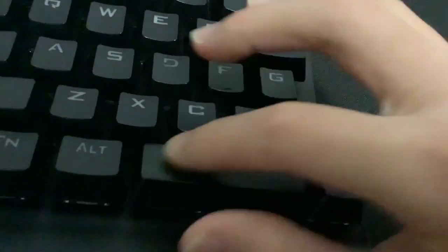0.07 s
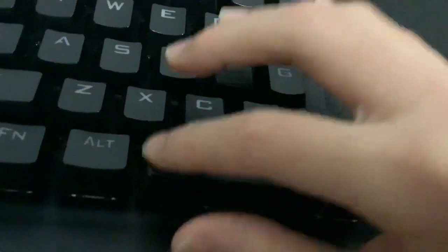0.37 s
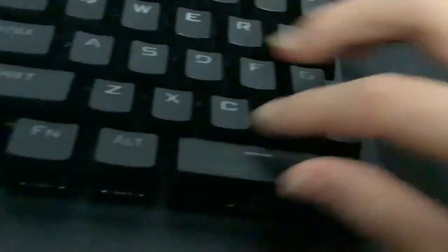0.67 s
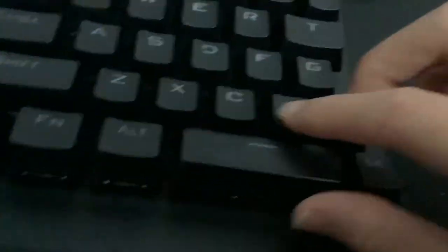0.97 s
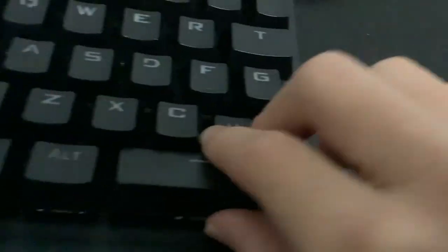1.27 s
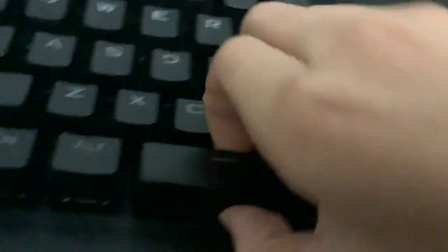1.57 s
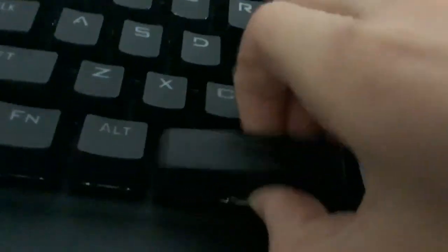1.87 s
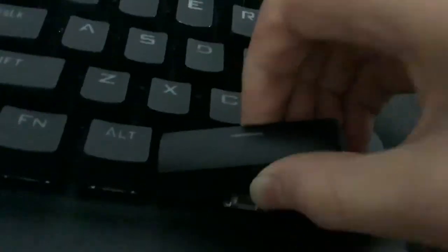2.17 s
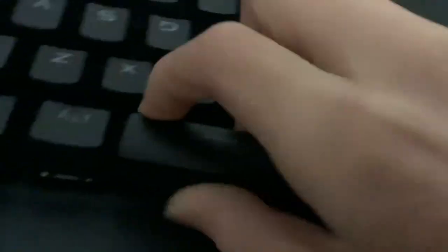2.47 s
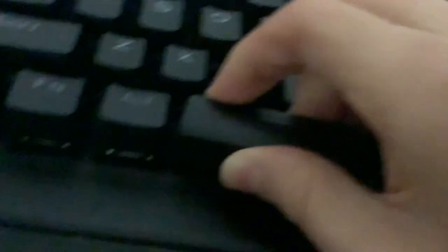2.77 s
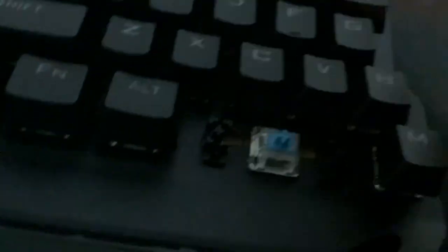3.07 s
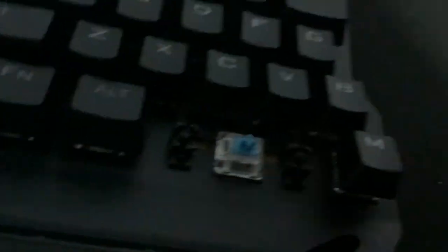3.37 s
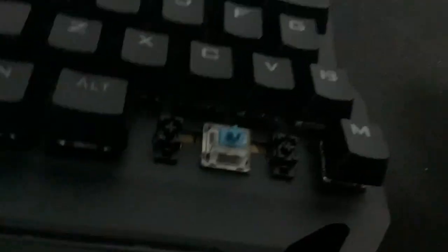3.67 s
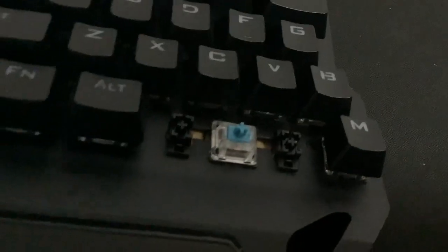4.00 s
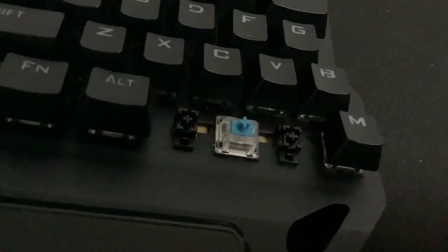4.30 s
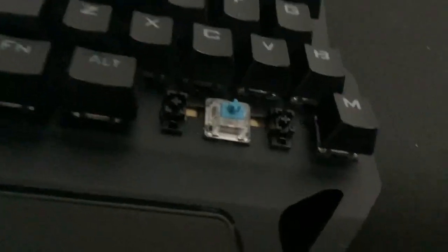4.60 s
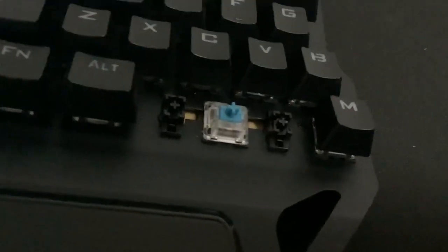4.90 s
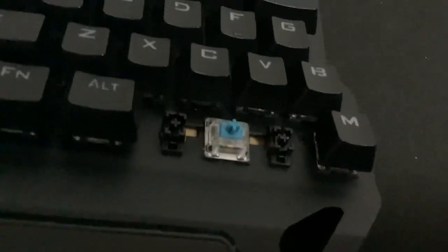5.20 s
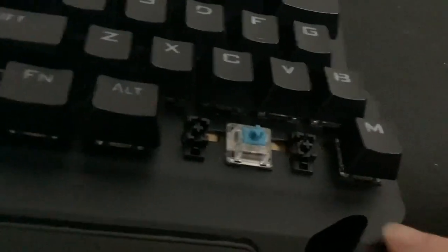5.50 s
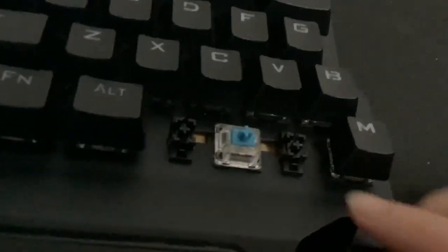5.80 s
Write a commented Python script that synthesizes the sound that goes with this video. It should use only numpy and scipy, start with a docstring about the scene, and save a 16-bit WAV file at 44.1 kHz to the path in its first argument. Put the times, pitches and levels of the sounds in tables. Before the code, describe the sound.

A hand taps three quick, bright keystrokes on a clicky mechanical keyboard. Fingers then rub and rock the space bar, making soft scrapes, small ticks and hollow knocks against the case. The bar comes off with a sharp snap and a thump, slaps the desk and clatters briefly to rest. A fingertip faintly brushes the desk. The microphone is close, in a small quiet room with a low steady rumble.

```python
"""A desk in a small quiet room, microphone close. A hand taps three keystrokes on a clicky mechanical
keyboard, then rubs and rocks the space bar until it snaps off. The long plastic cap slaps the desk
and clatters to rest; a fingertip brushes the desk. Each hit is a brief soft onset of noise, a sharp
contact and chatter ringing a part's resonances; rubbing is a train of tiny slips. Pushes thump the
keyboard case. The room answers each hit, over a low steady rumble."""
import sys
import numpy as np
from scipy import signal
from scipy.fft import rfft, irfft, next_fast_len
from scipy.io import wavfile

SR = 44100
rng = np.random.default_rng(int(sys.argv[2]) if len(sys.argv) > 2 else 0)


def master(y):
    """Save y as 16-bit WAV."""
    cut = np.clip(np.atleast_2d(y).T, -1, 1)
    pcm = np.round(cut * 32767)  # scale
    wavfile.write(sys.argv[1], SR, pcm.astype(np.int16))


N = 257984
HIT_SAMPLES = 4096
HZ = np.fft.rfftfreq(HIT_SAMPLES, 1 / SR)
BOTTOM_LAG_S, TOP_LAG_S = .0078, .012  # from a switch click to the end of key travel, down and up

# Hits: (time [s], level [dB], brightness [dB/octave])
DOWN_CLICKS = [(0.025, -27, -1), (0.1943, -21.5, 2), (0.3787, -21, 2)]
UP_CLICKS = [(0.0998, -24, 0.1), (.2758, -19.5, 1), (0.4523, -20, 2)]
BAR_LANDINGS = [(3.7673, -26.5, -1), (3.782, -49, 10), (3.8029, -26.5, 0.5), (3.8191, -27, 3),
                (3.839, -43, 12)]
# Space bar on its stabilisers: (time [s], level [dB], brightness [dB/octave], case thump [dB])
BAR_KNOCKS = [(0.5143, -36.5, 2, -50), (0.5362, -31, 7.5, -38), (0.5462, -42, -2, -33),
              (.604, -41, 4.5, -56), (.6164, -34, 3.5, -42), (1.2717, -40, 1, -36.5),
              (1.439, -45.5, -2.5, -42), (1.499, -39, 1, -29.5), (1.548, -35, 1.5, -27.5),
              (1.5664, -43.5, -1, -57), (1.8907, -44.5, 4, -29.5), (1.9488, -28, 0, -23),
              (2.0078, -30, .5, -34), (2.3684, -37, 0, -32.5), (2.4015, -40, 1, -51),
              (2.4379, -42, -2, -48), (2.521, -48.5, 1, -40), (2.6039, -57, 4, -47.5),
              (2.831, -55, -3, -58), (2.8795, -36.5, 1.5, -26), (2.8976, -38, 0, -66),
              (2.9614, -43, 0.5, -42), (2.9874, -34.5, 1.5, -38)]
# Fingers over the caps: (start [s], end [s], level [dB], share of bright rattle [0-1])
FINGER_RUBS = [(0, 0.136, -44.5, 0.87), (0.218, 0.46, -55.5, 0.94), (0.53, 0.66, -61, 0.59),
               (1.159, 1.413, -65.5, 0.07), (1.396, 1.538, -54.5, 0), (1.561, 1.72, -60.5, 0.37),
               (1.97, 2.033, -50, 0.2), (2.394, 2.642, -58, 0.09), (2.873, 2.918, -50, 0.15),
               (2.916, 3.107, -62.5, 0.24)]
# Resonances of a pressed key, a ticking cap, the bar: (frequency [Hz], half-width [Hz], level [dB])
PRESS_MODES = [(400, 114, -12.5), (840, 33.7, -10.5), (1930, 56.4, -11), (2280, 340, -24), (3800, 92, -2),
               (4310, 250, 1.5), (5485, 510, -16.5), (7650, 420, -0.5), (8900, 367, -3.5), (9900, 800, 0.5),
               (10900, 830, -4.5), (14730, 1800, -18.5)]
TICK_MODES = [(380, 45, -8), (800, 38, -7), (2018, 190, -11), (2507, 1200, -17), (4040, 270, -8.5),
              (5360, 270, -14), (8450, 350, 3), (8960, 85, 8), (11380, 1500, -0.5), (13890, 1900, -18.5)]
BAR_MODES = [(394.2, 49, 4.5), (797, 47, 0), (1015, 110, -10), (1430, 300, -11.5), (1898, 70, 0),
             (2181, 100, -7), (3080, 360, -13.5), (4140, 600, -7.5), (5550, 450, -7.5), (8600, 730, -7),
             (11810, 1210, -8), (14870, 1400, -31)]
# Five bands that balance a hit: (edge [Hz])
BAND_EDGES_HZ = [350, 1300, 3300, 6800, 11500, 16000]
# Balance of a key press and of a bar knock: (relative level [dB]) per band
PRESS_BANDS_DB = [-19, -16.5, -10, 0.5, -11]
BAR_BANDS_DB = [-0.5, 0, -1, -8.5, -9.5]


def amp(db):
    return 10 ** (np.asarray(db) / 20)


def unit_rms(x):
    return x / np.sqrt(np.mean(x ** 2) + 1e-20)


def curve_at(points, hz):
    """Interpolates (frequency [Hz], value) points on a log axis."""
    point_hz, value = np.transpose(points)
    return np.interp(np.log(hz + 1), np.log(point_hz + 1), value)


def add(mix, start_s, sound):
    part = mix[max(round(start_s * SR), 0):][:len(sound)]
    part += sound[:len(part)]


def plastic_response(modes, floor_db=-30):
    """Minimum-phase frequency response of a resonant plastic part."""
    gain = amp(floor_db) + sum(amp(db) / (1 + ((HZ - hz) / width_hz) ** 2) for hz, width_hz, db in modes)
    gain = gain * HZ ** 2 / (HZ ** 2 + 300 ** 2) + 1e-4  # small parts radiate no bass
    log_gain = np.log(np.r_[gain, gain[-2:0:-1]])
    return np.exp(np.conj(signal.hilbert(log_gain)))[:len(HZ)]


def balance(spectrum, bands_db, level_db, bright_db_oct):
    """Sets a hit's band balance and its level over 10 ms; harder contacts tilt towards the treble."""
    band = np.clip(np.searchsorted(BAND_EDGES_HZ, HZ) - 1, 0, len(bands_db) - 1)
    centres_hz = np.sqrt(np.multiply(BAND_EDGES_HZ[:-1], BAND_EDGES_HZ[1:]))
    target_db = np.array(bands_db) + bright_db_oct * np.log2(centres_hz / 4700)
    for _ in range(2):
        change_db = target_db - 10 * np.log10(np.bincount(band, abs(spectrum) ** 2))
        change_db = np.maximum(change_db, change_db.max() - 20.5)  # the part keeps its character
        spectrum = spectrum * amp(curve_at(np.c_[centres_hz, change_db], HZ))
    rms_10ms = np.linalg.norm(spectrum) * np.sqrt(2 / HIT_SAMPLES / (.01 * SR))
    return amp(level_db) * spectrum / rms_10ms


def hits(events, modes, bands_db, contact_s, send_db, chatter, onset_db, chatter_low_hz):
    """A brief soft onset of noise, a contact and dying chatter ring a part: (direct, room send)."""
    lead_s, onset_s = 320 / SR, .0011
    t = np.arange(HIT_SAMPLES) / SR - lead_s
    contact = rfft(signal.unit_impulse(HIT_SAMPLES, round(lead_s * SR)))
    highpass = HZ ** 2 / (HZ ** 2 + chatter_low_hz ** 2)  # chatter is too fine to drive low modes
    onset = amp(onset_db) * np.exp(-abs(t) / onset_s)
    direct, send = np.zeros((2, N))
    for time_s, level_db, bright_db_oct, *_ in events:
        # each spot struck favours different resonances
        spot_modes = [(hz, width_hz, db + rng.uniform(-3.9, 3)) for hz, width_hz, db in modes]
        response = plastic_response(spot_modes)
        decay_s = np.clip(contact_s * 2 ** (-bright_db_oct / 3.5), 1e-4, .007)  # dull hits last longer
        envelope = np.where(t < 0, onset, np.exp(-abs(t) / decay_s))
        jitter = envelope * rng.choice([-1, 1], HIT_SAMPLES)
        force = contact + chatter * highpass * rfft(jitter / np.linalg.norm(jitter))
        hit = irfft(balance(force * response, bands_db, level_db, bright_db_oct))
        add(direct, time_s - lead_s, hit)
        # the room gathers all directions, which leaves the part's own ring
        ring = irfft(balance(contact * response, bands_db, level_db, bright_db_oct))
        add(send, time_s - lead_s, amp(send_db) * ring)
    return np.array([direct, send])


def slips(modes, rate_per_s, spread_db):
    """A random train of tiny slips rings a part."""
    train = rng.standard_normal(N) * (rng.random(N) < rate_per_s / SR)
    train *= amp(spread_db * np.minimum(rng.exponential(1, N), 3))
    ring = irfft(plastic_response(modes, floor_db=-46.5))
    return unit_rms(signal.oaconvolve(train, ring)[:N])


def air(level_db=-61, low_hz=36):
    """Steady room rumble with a faint hiss."""
    # Noise spectrum and its treble cut: (frequency [Hz], gain [dB])
    spectrum = [(15, -45.5), (25, -20), (53, -4.5), (74, 0.5), (87, -9), (123, -8), (149, -14.5),
                (175, -11), (317, -17.5), (775, -29), (936, -28), (1230, -30.5), (1400, -32.5),
                (9570, -41.5), (16000, -39.5)]
    treble_cut = [(1000, 0), (3000, -2.5), (11000, -2.5), (16000, -5.5)]
    hz = np.fft.rfftfreq(N, 1 / SR)
    highpass = hz ** 4 / (hz ** 4 + low_hz ** 4)
    gain = amp(curve_at(spectrum, hz) + curve_at(treble_cut, hz)) * highpass
    return amp(level_db) * unit_rms(irfft(rfft(rng.standard_normal(N)) * gain, N))


def rubbing():
    """Skin scrapes dully on the bar; loose caps rattle brightly."""
    # Skin on the bar: (frequency [Hz], half-width [Hz], level [dB])
    scrape_modes = [(400, 87, 0.5), (799, 48, 4.5), (2070, 780, -14), (3890, 3600, -20.5)]
    scrape = slips(scrape_modes, rate_per_s=2500, spread_db=-.5)
    rattle = slips(PRESS_MODES, rate_per_s=930, spread_db=6)
    out = np.zeros(N)
    for start_s, end_s, db, share in FINGER_RUBS:
        span = slice(int(start_s * SR), int(end_s * SR))
        rub = unit_rms(np.sqrt(1 - share) * scrape[span] + np.sqrt(share) * rattle[span])
        add(out, start_s, amp(db) * rub * signal.windows.tukey(len(rub), .3))
    return out


def typing():
    """Key down: touch, click of the leaf, bottoming out. Key up: slider slip, click, top stop."""
    # Finger lands, slider catches: (time [s], level [dB], brightness [dB/octave])
    touches = [(.0129, -24.5, 1), (.1722, -21, -.5), (.3538, -27, -1)]
    # Rising key: (frequency [Hz], half-width [Hz], level [dB])
    release_modes = [(810, 250, -21.5), (1920, 146, -17.5), (3794, 71, -8), (4080, 340, 1),
                     (6700, 1900, -22.5), (8670, 890, -4), (10020, 312, 4), (11200, 920, -10.5),
                     (13976, 2000, -26.5)]
    # Balance: (relative level [dB]) per band
    bottom_bands_db = [-3.5, -8, -3, 0.5, -10]
    release_bands_db = [-21, -22, -7.5, 0, -14.5]
    bottoms = [(time_s + BOTTOM_LAG_S, -34.5, 0) for time_s, _, _ in DOWN_CLICKS]
    slider_slips = [(time_s - .01, db - 12, -1) for time_s, db, _ in UP_CLICKS]
    top_stops = [(time_s + TOP_LAG_S, db - 16.5, 1) for time_s, db, _ in UP_CLICKS]
    return (hits(touches, PRESS_MODES, PRESS_BANDS_DB,
                 contact_s=.0034, send_db=-6.5, chatter=2.7, onset_db=-11.5, chatter_low_hz=600)
            + hits(DOWN_CLICKS, PRESS_MODES, PRESS_BANDS_DB,
                   contact_s=.0022, send_db=-10, chatter=2.7, onset_db=-5.5, chatter_low_hz=1200)
            + hits(bottoms, TICK_MODES, bottom_bands_db,
                   contact_s=.0018, send_db=-5.5, chatter=1.5, onset_db=-16, chatter_low_hz=670)
            + hits(slider_slips, release_modes, release_bands_db,
                   contact_s=.0075, send_db=-10.5, chatter=3.6, onset_db=-9.5, chatter_low_hz=1400)
            + hits(UP_CLICKS, release_modes, release_bands_db,
                   contact_s=.002, send_db=-10.5, chatter=6.5, onset_db=-17, chatter_low_hz=1500)
            + hits(top_stops, release_modes, release_bands_db,
                   contact_s=.001, send_db=-11.5, chatter=3.6, onset_db=-19, chatter_low_hz=2000))


def catches(rate_per_s=45, max_per_rub=16, above_rub_db=3, spread_db=7, bright_db_oct=-.5):
    """A rubbing finger catches at random: dull knocks of the bar, bright ticks of loose caps."""
    knocks, rattles = [], []
    for start_s, end_s, rub_db, share in FINGER_RUBS:
        times_s = start_s + np.cumsum(rng.exponential(1, max_per_rub)) / rate_per_s
        levels_db = rub_db + above_rub_db + spread_db * rng.uniform(-1, 1, max_per_rub)
        for time_s, db, draw in zip(times_s, levels_db, rng.random(max_per_rub)):
            if time_s < end_s:
                (rattles if draw < share else knocks).append((time_s, db, bright_db_oct))
    return (hits(knocks, BAR_MODES, BAR_BANDS_DB,
                 contact_s=.0044, send_db=-3.5, chatter=2.2, onset_db=-16, chatter_low_hz=360)
            + hits(rattles, PRESS_MODES, PRESS_BANDS_DB,
                   contact_s=.00118, send_db=-5, chatter=2.2, onset_db=-12.5, chatter_low_hz=750))


def case_thumps(typing_pitch=.85, grip_pitch=1.095, landing_pitch=1.8, low_hz=75):
    """Nudges, key stops, bar knocks and landings set the case ringing briefly on the desk."""
    # Case on the desk: (frequency [Hz], level [dB], T60 [s])
    case_modes = [(88.9, 4.5, 0.18), (118, 4.5, 0.11), (163, -21, 0.06), (268, -6, 0.048),
                  (415.8, -8, 0.16), (820, -17, 0.03)]
    # Soft pushes: (time [s], peak [dB], pitch [ratio])
    nudges = [(.575, -39, 1.1), (.789, -46, 1.3), (1.137, -43, 0.82), (1.684, -43, 1.2), (1.979, -26, 1.2),
              (3.691, -37, 1.8)]
    pushes = (nudges
              + [(time_s + BOTTOM_LAG_S, -31, typing_pitch) for time_s, _, _ in DOWN_CLICKS]
              + [(time_s + TOP_LAG_S, -43, typing_pitch) for time_s, _, _ in UP_CLICKS]
              + [(time_s + .00235, thump_db, grip_pitch) for time_s, _, _, thump_db in BAR_KNOCKS]
              + [(time_s, db - 17, landing_pitch) for time_s, db, _ in BAR_LANDINGS])
    t, out = np.arange(SR // 4) / SR, np.zeros(N)
    for time_s, peak_db, pitch in pushes:
        # hand pressure shifts the bounce on the feet, not the hollow case's own notes
        ring = sum(amp(db - 60 * t / t60_s) * np.sin(2 * np.pi * hz * (pitch if hz < 300 else 1) * t)
                   for hz, db, t60_s in case_modes)
        add(out, time_s, amp(peak_db) * ring / abs(ring).max())
    return signal.sosfilt(signal.butter(2, low_hz, "high", fs=SR, output="sos"), out)


def prying():
    """Nails and loose caps tick; the space bar knocks until it snaps off its stems."""
    # Hits: (time [s], level [dB], brightness [dB/octave])
    ticks = [(.3693, -30, 5.5), (.9533, -56.5, -5.5), (1.1381, -54.5, -3.5), (1.2381, -45.5, 0),
             (1.251, -35.5, 2), (1.5359, -36.5, 8), (1.6566, -46, -3.5), (1.682, -34.5, 2.5),
             (1.6883, -36.5, 7.5), (2.6986, -35.5, 3.5), (2.7158, -46, -4), (3.049, -45, 5),
             (3.0618, -40.5, -2), (3.6842, -40.5, 0), (5.421, -65, -2)]
    snaps = [(3.4898, -19, 0), (3.4998, -20, 7.5)]
    # Stems letting go: (frequency [Hz], half-width [Hz], level [dB])
    snap_modes = [(484, 370, -10), (1930, 330, -17), (2610, 390, -21), (3820, 83, 1), (4650, 298, -7),
                  (5530, 360, -14), (5700, 157, -6.5), (8150, 550, -9), (10450, 300, -6),
                  (11900, 870, -13.5), (12830, 900, -11), (15330, 620, -14)]
    # Balance: (relative level [dB]) per band
    tick_bands_db = [-13, -7, -3.5, -1, -8.5]
    snap_bands_db = [-13.5, -8.5, 2, -3, -5]
    return (hits(ticks, TICK_MODES, tick_bands_db,
                 contact_s=.0039, send_db=-3, chatter=3.4, onset_db=-14, chatter_low_hz=360)
            + hits(BAR_KNOCKS, BAR_MODES, BAR_BANDS_DB,
                   contact_s=.0039, send_db=-4.5, chatter=4.7, onset_db=-6.5, chatter_low_hz=490)
            + hits(snaps, snap_modes, snap_bands_db,
                   contact_s=.0015, send_db=4, chatter=2.1, onset_db=-11.5, chatter_low_hz=1800))


def recoil(low_hz=45):
    """The freed keyboard drops back: one blunt push, no ring."""
    # Push: (time [s], peak before the high-pass [dB], width [s])
    push = (3.4998, -11.5, 0.00067)
    time_s, peak_db, width_s = push
    widths, out = np.arange(SR // 20) / SR / width_s, np.zeros(N)
    add(out, time_s, amp(peak_db) * widths * np.exp(1 - widths))
    return signal.sosfilt(signal.butter(2, low_hz, "high", fs=SR, output="sos"), out)


def falling():
    """The freed bar slaps the desk flat, tumbles, then skips from edge to edge."""
    # Hits: (time [s], level [dB], brightness [dB/octave])
    slap = [(3.5982, -17, 0)]
    skips = [(3.8674, -21.5, 0), (3.8703, -27.5, 3), (3.8868, -50, 7), (3.9157, -38, -3.5),
             (3.9273, -24.5, 2.5), (3.9469, -39, -3), (3.9553, -35.5, -3.5), (3.9729, -37.5, -4.5)]
    # Bar on the desk: (frequency [Hz], half-width [Hz], level [dB])
    landing_modes = [(550, 110, -7.5), (854, 37, 2.5), (1080, 75, -2.5), (1324, 140, -5), (1614, 310, -5.5),
                     (1920, 130, 3.5), (2387, 344, -22), (3125, 406, -3), (3760, 250, -3.5),
                     (4140, 170, -9.5), (5125, 700, -18.5), (7650, 1540, -24.5), (10400, 310, -14.5),
                     (13000, 2600, -31.5)]
    skip_modes = [(470, 250, 0), (1068, 140, -25.5), (1870, 86, -15), (2650, 300, -26), (3106, 140, 3),
                  (3850, 110, 1.5), (4677, 320, 7.5), (5190, 260, -7), (5800, 310, 1.5), (7500, 640, -8),
                  (10300, 580, -4), (12300, 1400, -18)]
    # Balance: (relative level [dB]) per band
    slap_bands_db = [-1.5, 0, -5, -12, -16.5]
    landing_bands_db = [-11.5, -1, 1, -15, -16.5]
    skip_bands_db = [-21.5, -1.5, -0.5, -6, -16.5]
    return (hits(slap, landing_modes, slap_bands_db,
                 contact_s=.0043, send_db=-9, chatter=2.4, onset_db=-26, chatter_low_hz=1200)
            + hits(BAR_LANDINGS, landing_modes, landing_bands_db,
                   contact_s=.0033, send_db=0, chatter=1.5, onset_db=-6, chatter_low_hz=600)
            + hits(skips, skip_modes, skip_bands_db,
                   contact_s=.0031, send_db=0, chatter=3.2, onset_db=-6, chatter_low_hz=840))


def brushing():
    """A fingertip slips over the desk in faint swells of hiss."""
    # Strokes: (start [s], end [s], level [dB])
    strokes = [(5.331, 5.47, -67), (5.77, 5.9, -72.5)]
    # Skin on the desk: (frequency [Hz], half-width [Hz], level [dB])
    hiss_modes = [(2003, 300, -5.5), (4760, 950, -0.5), (9200, 1700, -10)]
    hiss, out = slips(hiss_modes, rate_per_s=3000, spread_db=.5), np.zeros(N)
    for start_s, end_s, db in strokes:
        size = int((end_s - start_s) * SR)
        stroke = np.roll(hiss, -int(start_s * SR))[:size]
        add(out, start_s, amp(db) * stroke * np.hanning(size))
    return out


def room(send, gap_s=.00375, build_s=.0034, echoes_per_s=6000, crossfade_hz=3, wet_db=-3):
    """Dense reflections build up, then die band by band; three tails take turns as the hand moves."""
    # Decay: (frequency [Hz], T60 [s])
    decay = [(150, 0.18), (800, 0.24), (2000, 0.26), (3200, 0.3), (4800, 0.35), (6700, .32), (9000, 0.27),
             (12000, 0.35), (15000, 0.2)]
    # Colour: (frequency [Hz], gain [dB])
    colour = [(150, 2), (800, 0), (2000, -3.5), (4500, -6), (6700, -6), (9000, -2), (12000, -9.5),
              (15500, 5)]
    t, out = np.arange(SR * 3 // 4) / SR, np.zeros(N)
    for k in range(3):
        echoes = rng.standard_normal(len(t)) * (rng.random(len(t)) < echoes_per_s / SR)
        echoes *= np.clip((t - gap_s) / build_s, 0, 1)
        hz, age_s, frames = signal.stft(echoes, SR, nperseg=256)
        gain_db = curve_at(colour, hz)[:, None] - 60 * age_s / curve_at(decay, hz)[:, None]
        tail = signal.istft(frames * amp(gain_db), SR, nperseg=256)[1]
        weight = np.sqrt(2 / 3) * np.cos(2 * np.pi * (crossfade_hz * np.arange(N) / SR + k / 3))
        out += signal.fftconvolve(send * weight, tail / np.linalg.norm(tail))[:N]
    return amp(wet_db) * out


def scene():
    """Plastic hits, friction and low thumps in the room; mono."""
    direct, send = typing() + prying() + falling()
    friction = rubbing() + brushing()
    thumps = case_thumps() + recoil()
    reverb = room(send + amp(-5) * friction + amp(-14) * thumps)
    mix = direct + friction + thumps + reverb + air()
    catch_direct, catch_send = catches()
    return (mix + catch_direct + room(catch_send))[None]


def record(dry, lag_cycles=.89, ceiling=.8, cutoff_hz=15900):
    """Microphone: bass lags treble, the loudest peaks round off, the band is limited."""
    size = next_fast_len(N + SR)
    hz = np.fft.rfftfreq(size, 1 / SR)
    bass_lag = np.exp(-2j * np.pi * lag_cycles * np.log((hz + 10) / (hz + 3000)))
    lagged = irfft(rfft(dry, size) * bass_lag, size)[:, :N]
    rounded = lagged / (1 + (lagged / ceiling) ** 4) ** .25
    lowpass = signal.firwin(255, cutoff_hz, window=("kaiser", 8), fs=SR)
    return signal.oaconvolve(rounded, lowpass[None], "same")


dry = scene()
out = record(dry)
master(out)
```